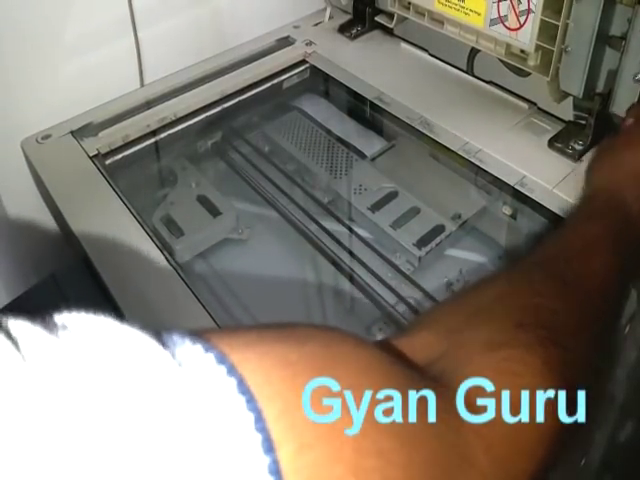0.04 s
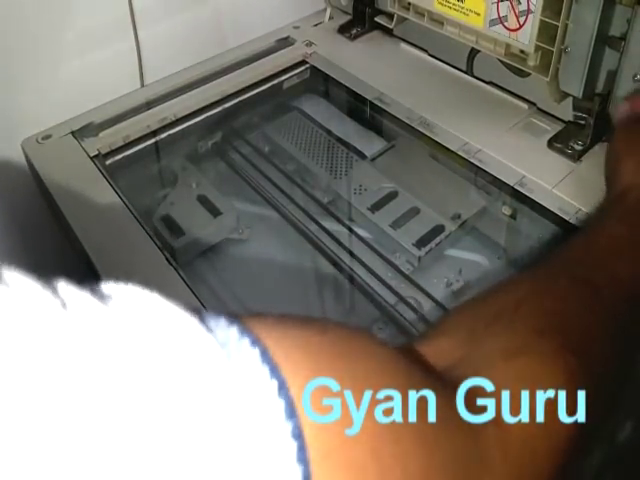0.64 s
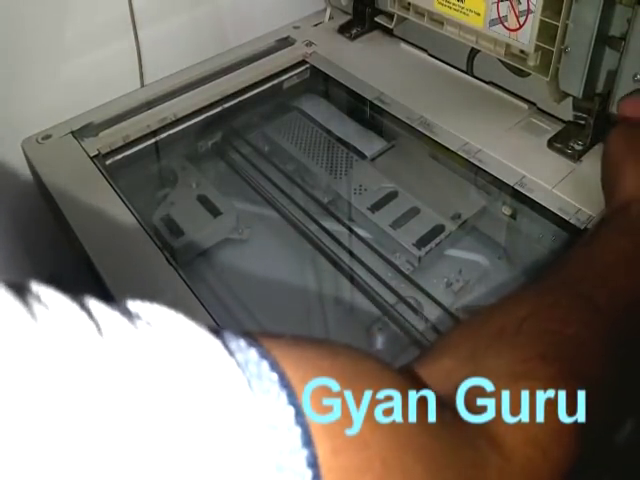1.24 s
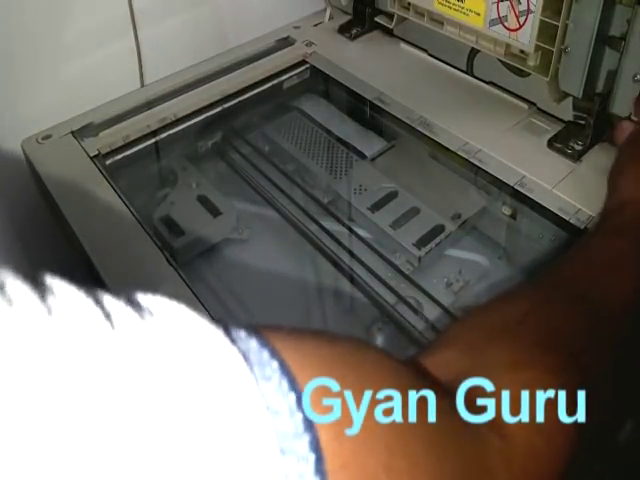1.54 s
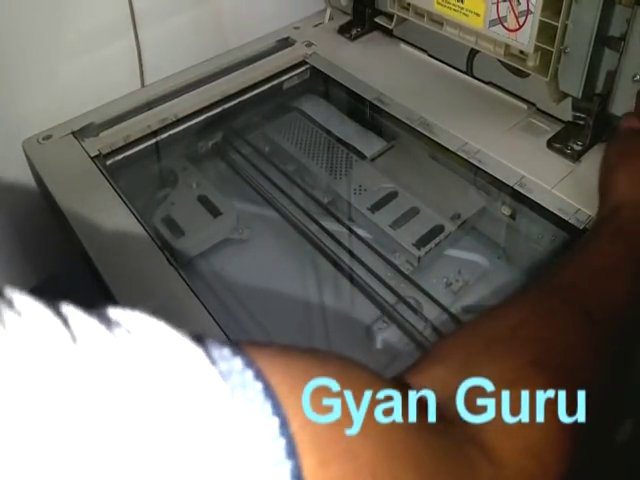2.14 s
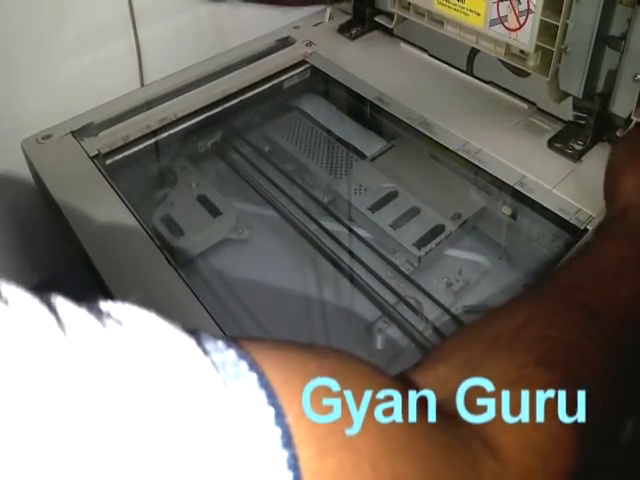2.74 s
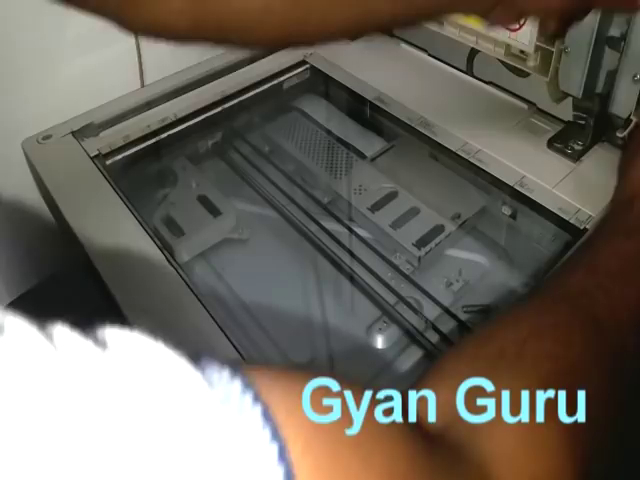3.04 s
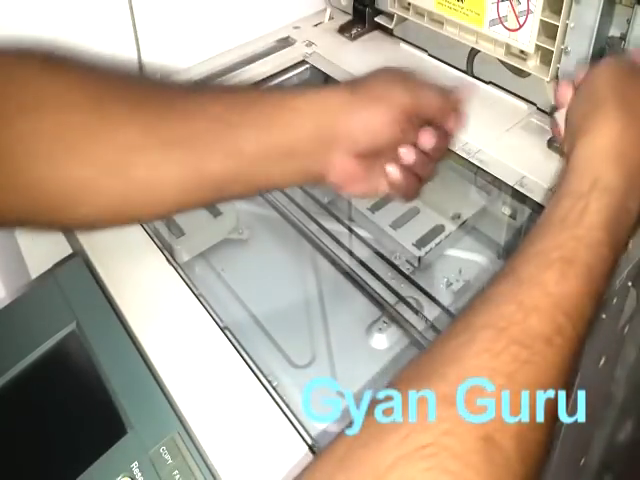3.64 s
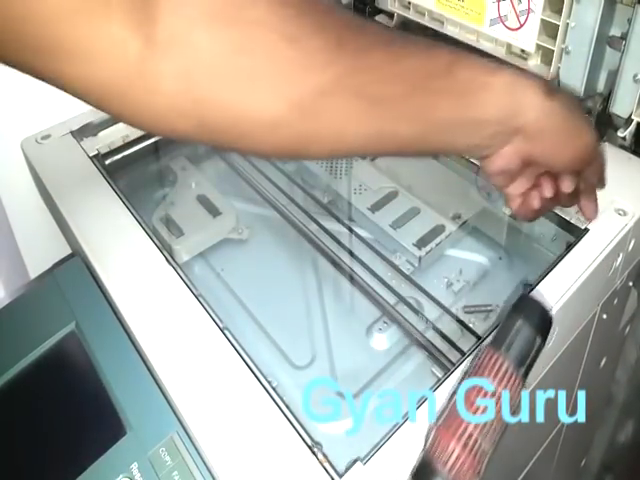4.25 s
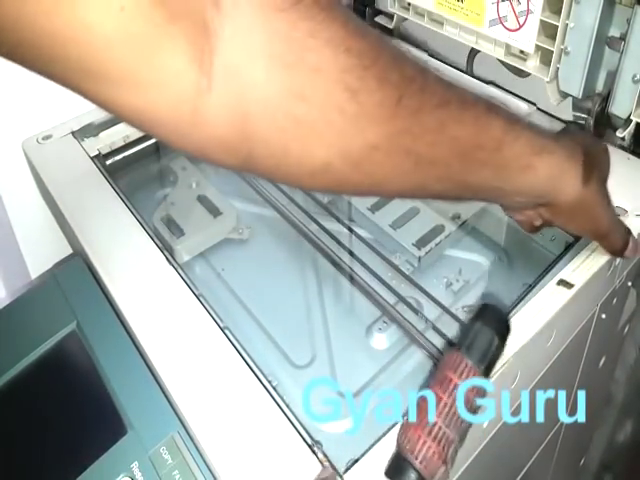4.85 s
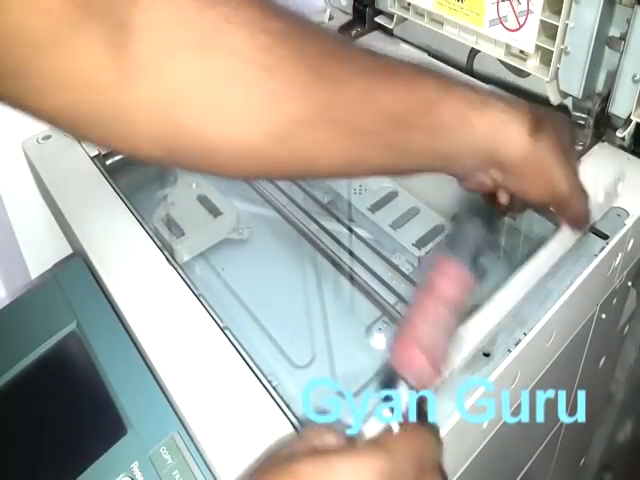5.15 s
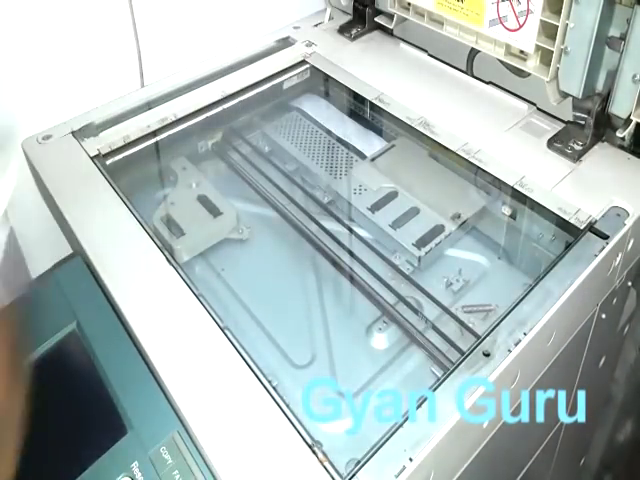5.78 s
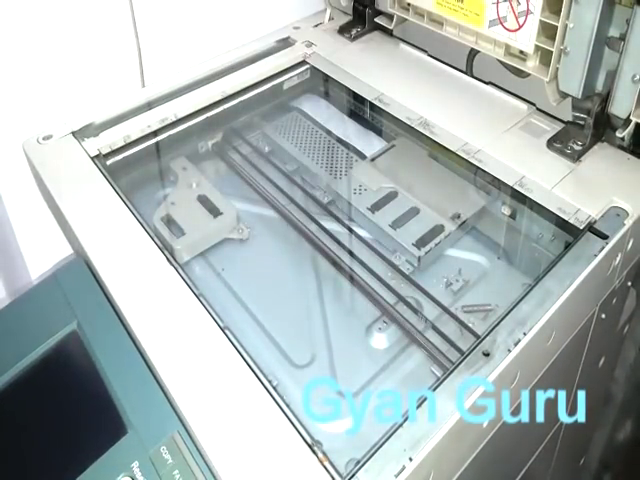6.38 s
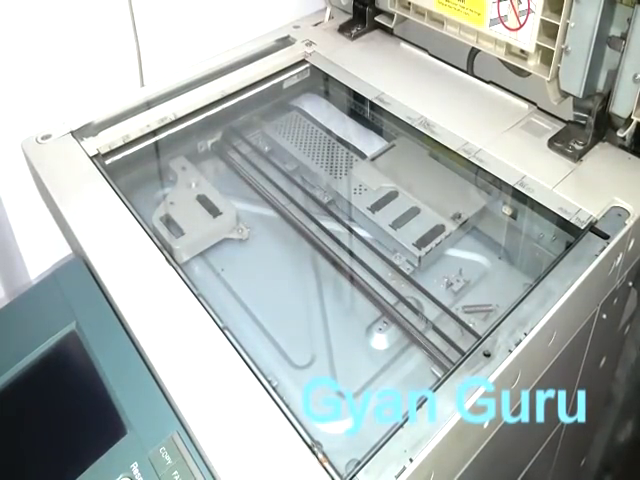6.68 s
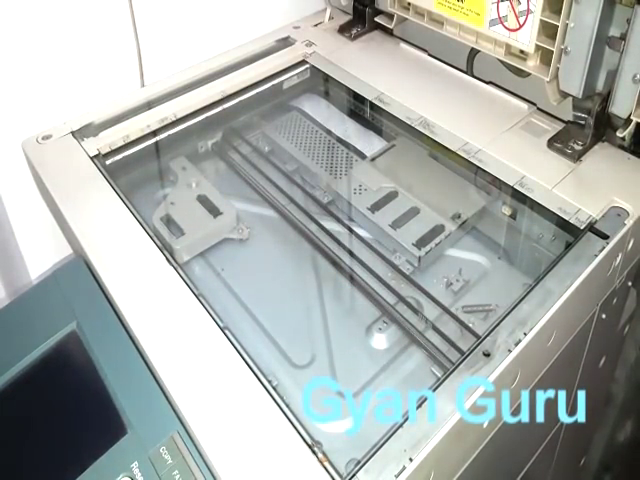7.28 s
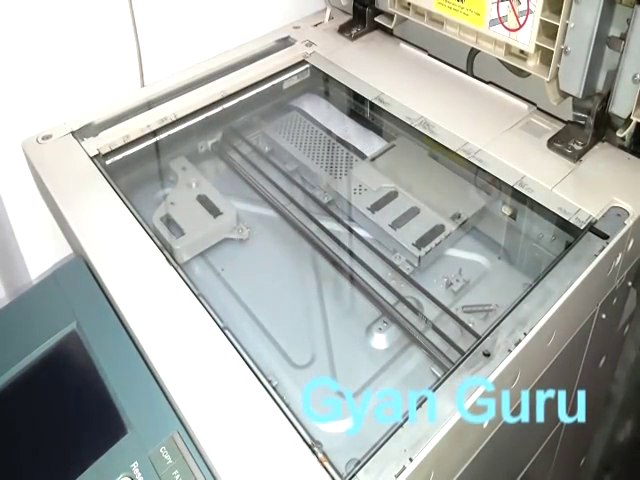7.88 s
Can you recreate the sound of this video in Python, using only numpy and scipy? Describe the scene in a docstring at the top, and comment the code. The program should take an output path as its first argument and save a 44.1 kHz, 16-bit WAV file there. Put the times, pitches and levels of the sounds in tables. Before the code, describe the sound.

A faint, high throbbing trill and a low fan hum fill a small room, picked up nearly in mono. A screw catches and grinds as it is turned, followed by a ringing screwdriver clack and hollow bumps on a copier. Plastic trim then strains and comes off with two cracks, the first the loudest sound, each with a quick flapping rattle. After light hand brushes, the strip lands with a dull thud and a tiny clink.

```python
"""A screw is backed out of a photocopier's frame, the screwdriver clacks against the machine, and a
plastic trim strip is prised off the glass and put down with a dull double thud. Each impact excites
the damped modes of the struck part; grinding and creaking are stick-slip friction. The room is small
and hard-walled; a fan hums and a high throbbing trill, like two crickets, goes on throughout."""
import sys
import numpy as np
from scipy import signal
from scipy.io import wavfile

SR = 44100
rng = np.random.default_rng(int(sys.argv[2]) if len(sys.argv) > 2 else 0)


def store_pcm(level_fs):
    """Save levels as 16-bit WAV."""
    pcm = np.round(np.clip(level_fs, -1, 1) * 32767).astype(np.int16)
    wavfile.write(sys.argv[1], SR, np.atleast_2d(pcm).T)


N = 349272
TIME = np.arange(N) / SR
BANDS_HZ = 31.25 * 2 ** (np.arange(28) / 3)

# An impact row gives time in seconds, level in dB, then its touch: bass, clack and sizzle in dB
# relative to the middle zone. A stroke row gives start and end in seconds, then level in dB.
# A spectrum row gives frequency in Hz and spectral density in dB.
# A mode row gives frequency in Hz, level in dB and T60 in seconds.

# Centres of the bass, middle, clack and sizzle zones in Hz.
ZONES_HZ = [350, 1200, 3800, 10500]
# Responses of the struck frame and screwdriver, as spectrum rows.
FRAME_SPECTRUM = [(60, -20.5), (130, -4.5), (280, 8.5), (500, 8), (800, -2), (1400, -7.5), (2500, -1.5),
                  (4000, -1.5), (6000, -1.5), (10000, -4.5), (15000, -14.5)]
TOOL_SPECTRUM = [(30, -28), (60, -14), (150, -2), (350, 5.5), (700, -1), (1400, -8), (2400, -10.5),
                 (3500, -11.5), (5000, -10), (7000, -7.5), (10000, -8), (15000, -14)]


def from_db(db):
    """Decibels express an amplitude ratio logarithmically."""
    return 10 ** (np.asarray(db) / 20)


def rms_one(x):
    """Normalisation to unit mean power."""
    return x / np.sqrt(np.mean(x ** 2) + 1e-20)


def at_bands(points):
    """Interpolation of (Hz, value) points in log frequency at the band centres."""
    hz, value = np.transpose(points)
    return np.interp(np.log(BANDS_HZ), np.log(hz), value)


def drift(rate):
    """Random modulation: a line through rate Gaussian values a second."""
    knots = rng.standard_normal(2000)
    return np.interp(TIME * rate, np.arange(len(knots)), knots)


def add(track, s, sound):
    """Superposition: a sound joins the track at s seconds."""
    start = int(s * SR)
    track[start:start + len(sound)] += sound[:N - start]


def noise_bank():
    """Band-pass filtering splits white noise into third octaves; neighbours are uncorrelated."""
    white, edge = rng.standard_normal((2, N)), 2 ** (1 / 6)
    filters = [signal.butter(2, [hz / edge, hz * edge], "band", fs=SR, output="sos") for hz in BANDS_HZ]
    return np.array([signal.sosfilt(sos, white[k % 2]) for k, sos in enumerate(filters)])


def band_decay(t60, length):
    """Exponential damping: each band builds up in about a cycle, then dies at its own rate."""
    t = TIME[:length]
    onset = (1 - np.exp(-2 * BANDS_HZ[:, None] * t)) ** 2
    return onset * np.exp(-np.log(1000) * t / t60[:, None])


def dense_modes(bank, envelope):
    """Modal overlap: crowded modes behave as bands of noise under an envelope."""
    length = envelope.shape[1]
    start = rng.integers(SR // 4, N - length)
    return bank[:, start:start + length] * envelope


def room_envelope(length):
    """Reverberation builds up as the first reflections arrive, then decays by absorption."""
    # Room decay. Each row: frequency in Hz, T60 in seconds.
    room_t60 = [(80, 0.83), (300, 0.46), (1000, 0.42), (3500, 0.32), (7000, 0.33), (14000, 0.13)]
    return band_decay(at_bands(room_t60), length) * (1 - np.exp(-TIME[:length] / 0.014))


def reverberation(bank, dry):
    """Convolution with a diffuse tail of unit energy gives the room's answer to a source."""
    tail = dense_modes(bank, room_envelope(SR * 3 // 4)).sum(axis=0)
    return signal.fftconvolve(dry, tail / np.linalg.norm(tail))[:N]


def soft_top(x, cutoff_hz=13200):
    """Low-pass filtering takes the highest treble from the quiet sounds."""
    return signal.sosfilt(signal.ellip(8, .5, 60, cutoff_hz, fs=SR, output="sos"), x)


def contact(hz, bass, clack, sizzle):
    """Contact hardness shapes the force spectrum, in dB relative to the middle zone."""
    return np.interp(np.log(hz), np.log(ZONES_HZ), [bass, 0, clack, sizzle])


def impacts(bank, rows, spectrum, gain_db, t60, bass_hold, room_db):
    """Impulse response: a crack, dense modes (low ones last longer) and the room add in power."""
    out, length = np.zeros(N), SR * 3 // 5
    crack = from_db(-2) * band_decay(np.full(len(BANDS_HZ), 0.022), length)
    ring = band_decay(t60 * (BANDS_HZ / ZONES_HZ[1]) ** -bass_hold, length)
    room = from_db(room_db) * room_envelope(length)
    envelope = np.sqrt(crack ** 2 + ring ** 2 + room ** 2)
    for s, level_db, *touch in rows:
        strength = from_db(level_db + gain_db + contact(BANDS_HZ, *touch) + at_bands(spectrum))
        add(out, s, strength @ dense_modes(bank, envelope))
    return out


def ringing(rows, modes, gain_db, spread_db):
    """Free vibration: each impact starts damped sines with random signs and a spread of levels."""
    out, t = np.zeros(N), TIME[:SR // 2]
    hz, mode_db, t60 = np.transpose(modes)
    cycles = hz[:, None] * t
    decay = np.exp(-np.log(1000) * t / t60[:, None])
    rings = np.sin(2 * np.pi * cycles) * (1 - np.exp(-2 * cycles)) * decay
    for s, level_db, *touch in rows:
        scatter_db = spread_db * rng.standard_normal(len(hz))
        strength = from_db(level_db + gain_db + contact(hz, *touch) + mode_db + scatter_db)
        add(out, s, (strength * rng.choice([-1, 1], len(hz))) @ rings)
    return out


def friction(bank, strokes, spectrum, gain_db, slips_per_s, uneven_db, t60):
    """Stick-slip friction: tiny uneven impulses shake a body during each stroke."""
    slips = (rng.random(N) < slips_per_s / SR) * from_db(uneven_db * rng.standard_normal(N))
    slips *= rng.choice([-1, 1], N)
    out, envelope = np.zeros(N), band_decay(np.full(len(BANDS_HZ), t60), SR // 10)
    for start, end, level_db in strokes:
        response = from_db(at_bands(spectrum)) @ dense_modes(bank, envelope)
        force = slips[int(start * SR) - len(response):int(max(end, start + .01) * SR)]
        shake = rms_one(signal.fftconvolve(force, response, "valid"))
        add(out, start, from_db(level_db + gain_db) * shake * signal.windows.tukey(len(shake), .5))
    return out


def room_air(bank):
    """Stationary broadband noise: the steady air of the room."""
    # The air, as spectrum rows.
    spectrum = [(25, -2), (55, -5.5), (85, -1), (112, 6), (140, -1.5), (200, 1.5), (300, 2.5), (420, -5),
                (1000, -10), (2600, -14), (5500, -22.5), (8000, -25), (12000, -26.5), (13500, -21),
                (15500, -58)]
    return from_db(-57) * rms_one(from_db(at_bands(spectrum)) @ bank)


def low_rush(bank):
    """Modulated noise: a low rush slowly fades, rising with the handling as the strip is prised off."""
    # The rushing noise, as spectrum rows.
    spectrum = [(40, -32), (100, -14.5), (350, 4.5), (1100, -1.5), (2500, -12), (5000, -28), (12000, -31.5)]
    rush = rms_one(from_db(at_bands(spectrum)) @ bank)[::-1]   # reversed: unrelated to the air
    handling_db = 13.5 * np.exp(-((TIME - 4.93) / 0.8) ** 2)
    return from_db(-55 - 3 * TIME + handling_db) * rush


def fan_hum():
    """Tonal noise: a fan's two low tones waver in frequency and amplitude."""
    # Each row: frequency in Hz, rms level in dB.
    tones = [(113, -66), (199.7, -61.5)]
    hum = np.zeros(N)
    for hz, level_db in tones:
        phase = 2 * np.pi * np.cumsum(hz + 1.69 * drift(8.8)) / SR
        hum += from_db(level_db) * rms_one(np.sin(phase) * (1 + 0.3015 * drift(3.5)))
    return hum


def cricket(chirp_rates, start_turn, hz, glide_hz, strokes_per_s, wander_hz, level_db):
    """Stridulation: wing strokes come in quick chirps, and the pitch sags through each stroke."""
    turn = start_turn + np.cumsum(np.interp(TIME, *np.transpose(chirp_rates))) / SR
    chirp = np.maximum(np.cos(2 * np.pi * turn) + 0.627, 0)
    stroke = np.cumsum(strokes_per_s * (1 + 0.028 * drift(9.4))) / SR % 1
    pitch = hz + glide_hz * (.5 - stroke) + wander_hz * drift(150)
    wings = np.sin(np.pi * stroke) * np.sin(2 * np.pi * np.cumsum(pitch) / SR)
    return from_db(level_db) * rms_one(chirp * wings)


def high_trill():
    """Amplitude modulation at two rates: a near and a far cricket-like voice throb out of step."""
    # Each row: time in seconds, chirps per second.
    near_rates = [(0, 10), (1.5, 9.96), (2, 10.08), (5, 10.08), (5.6, 10.3), (6.8, 10.3), (7.2, 10.02)]
    far_rates = [(0, 8.65), (7.9, 8.65)]
    near = cricket(near_rates, start_turn=0.7, hz=7290, glide_hz=707, strokes_per_s=109,
                   wander_hz=69.7, level_db=-59.5)
    far = cricket(far_rates, start_turn=0.36, hz=6710, glide_hz=894, strokes_per_s=99,
                  wander_hz=110.5, level_db=-71)
    return near + far


def screw_turns():
    """Stick-slip in a thread: the blade bites, the screw grinds, catches and runs on."""
    # Each row: time of the catch in seconds, its level in dB, its hardness in dB,
    # lead of the bite in seconds, grinding level in dB.
    turns = [(0.339, -38, 0, 0.075, -62), (1.654, -24.5, 6.5, 0.14, -39), (2.099, -33.5, 0.5, 0.091, -43.5),
             (2.614, -33.5, -1.5, 0.204, -44)]
    bass, clack, sizzle = -1.9, -17, -36.5
    bite_s, rest_s, grind_s, run_on_s = 0.037, 0.0071, 0.102, 0.129
    knocks, strokes = [], []
    for s, knock_db, hard_db, lead, grind_db in turns:
        bite = s - lead
        grind = bite + bite_s + rest_s
        knocks += [(bite, -46, bass, clack, sizzle),
                   (s, knock_db, bass - hard_db, clack + hard_db, sizzle),
                   (s + 0.011, knock_db - 9, 0.92, -27, -20)]   # the blade drops back into the slot
        strokes += [(bite, bite + bite_s, grind_db - 0.5),
                    (grind, grind + grind_s, grind_db),
                    (s, s + run_on_s, grind_db - 5)]
    return knocks, strokes


def frame_knocks(bank, catches):
    """Impact excitation: the screw's catches and light stray knocks ring the frame."""
    # Stray knocks as impact rows; the frame's resonances as mode rows.
    strays = [(0.879, -49.5, -2, -11, -20), (4.137, -44, -10, -6, -41), (5.644, -45, -31, -3.5, -24),
              (5.796, -41, -13, -16.5, -22)]
    modes = [(297, 1.5, 0.71), (452, 3, 0.13), (688, -6, 0.33), (1686, -9, 0.27), (1895, -7, 0.28),
             (2697, -33, .3), (4172, -18, .22)]
    hits = catches + strays
    knocks = impacts(bank, hits, FRAME_SPECTRUM, gain_db=7.5, t60=0.14, bass_hold=0.18, room_db=-6)
    return knocks + ringing(hits, modes, gain_db=-11.5, spread_db=0)


def screw_grinding(bank, grinds):
    """Structure-borne sound: friction in the thread and on the frame radiates as a low grinding."""
    # Rubs on the frame as stroke rows; the body they shake as spectrum rows.
    rubs = [(1.367, 1.428, -51.5), (2.955, 3.068, -44.5), (5.298, 5.467, -48)]
    body = [(100, -42), (220, 4), (320, 4), (520, 2), (750, -17.5), (1500, -23.5), (4000, -32.5),
            (12000, -41.5)]
    return friction(bank, grinds + rubs, body, gain_db=-3, slips_per_s=260, uneven_db=7, t60=0.051)


def screwdriver(bank):
    """Hard contact excites high modes: the blade pings off the screw and the tool hits the machine."""
    # Clacks of the tool and skids of its tip, as impact rows.
    clacks = [(3.004, -27, -11.5, 1.6, -32), (3.058, -17.5, -14, 12.3, -8.5), (3.071, -22, -2.5, 2, -26),
              (3.574, -57.5, -11, 13.6, 1), (3.807, -64, -3, 10, 6)]
    skids = [(2.988, -31.5, -17, 2, -29), (3.044, -18, -11.5, 6.5, -29)]
    # Resonances of the tool and its tip, as mode rows.
    tool_modes = [(652, 5, 0.35), (940, 0.5, 0.41), (2660, -10, 0.37), (3365, -1, 0.19), (3418, 0, 0.29),
                  (3475, -3.5, .33), (3900, -17, .18), (7270, 9.5, 0.2)]
    tip_modes = [(4250, -9, 0.068), (4260, -0.5, 0.097), (4480, -18, .04), (5200, -12, .04)]
    tool = impacts(bank, clacks, TOOL_SPECTRUM, gain_db=8.5, t60=0.17, bass_hold=0.17, room_db=-6.5)
    tool += ringing(clacks, tool_modes, gain_db=-17, spread_db=0)
    tip = impacts(bank, skids, TOOL_SPECTRUM, gain_db=6, t60=0.13, bass_hold=0.24, room_db=-1)
    tip += ringing(skids, tip_modes, gain_db=-9.5, spread_db=10)
    return tool + tip


def hand_brushes(bank):
    """Sliding friction: the dense slips of a hand on the casing merge into a hiss."""
    # The brushes as stroke rows; rubbing skin as spectrum rows.
    brushes = [(3.7, 3.82, -67), (5.305, 5.368, -54.5), (5.633, 5.718, -64.5), (6.197, 6.316, -61),
               (6.523, 6.6, -62), (6.62, 6.672, -55.5)]
    skin = [(200, -23), (1500, 1), (5000, -5), (7500, 0), (9000, -6), (13000, -2), (15000, -22)]
    return friction(bank, brushes, skin, gain_db=0.5, slips_per_s=3500, uneven_db=4, t60=0.0067)


def trim_scraping(bank, creaks):
    """Friction on a heavily damped body: the plastic strip scrapes, creaks and rattles."""
    # Rubs along the strip as stroke rows; its response as spectrum rows.
    rubs = [(3.921, 4.287, -57), (4.865, 5.177, -43.5)]
    body = [(40, -35), (100, -20), (300, 11), (1000, -2), (1500, -3), (3300, -6), (5500, -29.5),
            (8000, -19.5), (14000, -30)]
    return friction(bank, creaks + rubs, body, gain_db=-5.5, slips_per_s=600, uneven_db=2, t60=0.012)


def casing_bumps(bank):
    """Panel resonance: the screwdriver's handle bumps the hollow casing."""
    # The bumps as impact rows; the casing's resonances as mode rows.
    bumps = [(4.275, -31, -4, -1.5, -38), (4.347, -29, -6, -15.5, -31.5), (4.351, -20.5, -18, -12.5, -41.5),
             (4.39, -39, -3.5, -15.5, -30)]
    modes = [(124.4, 7, .35), (244, 10.5, .25), (293, 6.5, 0.47), (576, 1, 0.33), (964, -5, 0.27),
             (1421, -4, 0.235), (1850, -7.5, 0.12), (2360, -6, 0.177), (2810, -2, 0.17), (3360, -8.5, 0.16)]
    knocks = impacts(bank, bumps, FRAME_SPECTRUM, gain_db=6, t60=0.062, bass_hold=0.26, room_db=-8)
    return knocks + ringing(bumps, modes, gain_db=-13, spread_db=4)


def straining(snap_s, lead, creak_db, rise_db_per_s=189.5):
    """Stick-slip under rising load: the bent strip slips ever sooner and creaks ever louder."""
    slips = snap_s - lead * 0.51 ** np.arange(4)
    ticks = [(t, -30.5, -2, -1, -14) for t in slips]
    creaks = [(start, end, creak_db - rise_db_per_s * (snap_s - (start + end) / 2))
              for start, end in zip(slips, [*slips[1:], snap_s])]
    return ticks, creaks


def flapping(snap_s, snap_db, touch, lasts, loss_db):
    """Inelastic rebounds: the freed end slaps the frame sooner, weaker and duller, rattling between."""
    dulling_db = np.array([0, -1.78, -5.5])   # change of touch per flap
    slaps, rattles, t, k = [], [], snap_s, 0
    while t < snap_s + lasts and k < 10:
        gap = 0.0445 * 0.96 ** k
        level_db = snap_db - 0.5 - k * loss_db
        if k:
            slaps.append((t, level_db, *(np.array(touch) + k * dulling_db)))
        slaps.append((t + 0.47 * gap, level_db - 7.5, -13, -13.5, -33.5))   # softer backswing
        rattles.append((t, t + gap, level_db - 17.5))
        t, k = t + gap, k + 1
    return slaps, rattles


def prising():
    """Release of elastic energy: each end of the strip strains, snaps free and flaps."""
    # Each row: time in seconds, level, bass, clack and sizzle in dB, straining time in seconds,
    # creak level in dB, flapping time in seconds, loss per flap in dB.
    snaps = [(4.6625, -7, -19.5, -2.5, -16, 0.146, -17.5, 0.19, 4),
             (5.0, -17.5, -11, -2, -9, 0.065, -36, 0.11, 1.86)]
    hits_by_end, strokes = [], []
    for s, level_db, *touch, lead, creak_db, lasts, loss_db in snaps:
        ticks, creaks = straining(s, lead, creak_db)
        double_crack = [(s, level_db, *touch), (s + 0.003, level_db - 1, *touch)]
        slaps, rattles = flapping(s, level_db, touch, lasts, loss_db)
        hits_by_end.append(ticks + double_crack + slaps)
        strokes += creaks + rattles
    return hits_by_end, strokes


def trim_snaps(bank, first_hits, last_hits):
    """Transient response: the strip cracks as each end comes free, then ticks against the frame."""
    # Responses of the strip's two ends, as spectrum rows.
    first_end = [(30, -38), (60, -17), (150, -10), (350, 8), (650, 1.5), (1050, 1), (1500, -7.5),
                 (2200, -2.5), (3400, -0.5), (5000, -5), (7200, 0.5), (9000, -11), (14000, -1)]
    last_end = [(30, -28), (60, -16), (150, -4), (350, 7.5), (700, -1.5), (1200, -6.5), (1900, -3),
                (3500, -4), (5500, -11), (7500, -9.5), (10000, -18.5), (15000, -18)]
    # The strip's resonances as mode rows; its loose tick as an impact row.
    modes = [(1018, 3, 0.3), (1131.5, 0.5, 0.17), (1150, -10.5, 0.19), (1341, 0.5, 0.2), (1930, -2.5, 0.22),
             (2168, -7.5, 0.47), (2230, -6, 0.36), (2900, -20, .2), (3140, -6, .2), (3350, -3, 0.22),
             (3661, -5, 0.15), (3990, -6, 0.2), (6245, -20, .22), (7125, 20, 0.058)]
    taps = [(5.378, -32.5, -25, 0, -7)]
    first = impacts(bank, first_hits, first_end, gain_db=8.5, t60=0.072, bass_hold=0.074, room_db=-8.5)
    first += ringing(first_hits, modes, gain_db=-17, spread_db=3)
    last = impacts(bank, last_hits + taps, last_end, gain_db=7.5, t60=0.11, bass_hold=0.46, room_db=-6.5)
    return first + last


def table_thud(bank):
    """Soft contact excites mainly low modes: the strip is put down on a table."""
    # The landings as impact rows; the table's response as spectrum rows and as mode rows.
    landings = [(7.167, -18.5, -9, -35, -41), (7.204, -30, 4.5, -16, -46), (7.217, -19, -9, -29, -43),
                (7.225, -23, -7, -19, -27), (7.388, -41, -3, -29, -29)]
    tabletop = [(30, -24), (42, -10), (65, -3), (150, 6.5), (250, 5), (450, 8), (800, -1.5), (1300, -8),
                (2000, -17), (3500, -8), (6000, -10), (14000, -14)]
    modes = [(63, -1, 1), (87.2, 1.5, 0.58), (150, 2.5, 0.28), (201, 10.5, 0.31), (289, -1, 0.2)]
    thuds = impacts(bank, landings, tabletop, gain_db=12.5, t60=0.086, bass_hold=0.43, room_db=-8)
    return thuds + ringing(landings, modes, gain_db=-15, spread_db=2.5)


def loose_piece(bank):
    """Small bodies have high natural frequencies: a loose piece clinks after the thud."""
    # The clinks as impact rows; the piece's resonances as mode rows.
    clinks = [(7.228, -45, -10, 4, -5), (7.293, -43, -10, 10.7, -5.5)]
    modes = [(2590, -21, 0.31), (3280, -24, 0.22), (4180, -18, 0.09), (4330, -15.5, 0.14), (5800, -2, .035),
             (6000, -2, 0.054), (6400, 1, .035)]
    ticks = impacts(bank, clinks, TOOL_SPECTRUM, gain_db=11.5, t60=0.037, bass_hold=0.2, room_db=-5.5)
    return ticks + ringing(clinks, modes, gain_db=2, spread_db=2.5)


def scene():
    """Superposition of the handling and the steady sounds in one room, heard almost in mono."""
    bank = noise_bank()
    catches, grinds = screw_turns()
    hits_by_end, creaks = prising()
    knocks = frame_knocks(bank, catches) + casing_bumps(bank) + screwdriver(bank)
    strip = trim_snaps(bank, *hits_by_end) + table_thud(bank)
    rubs = screw_grinding(bank, grinds) + trim_scraping(bank, creaks) + hand_brushes(bank)
    trill = high_trill()
    room = from_db(-5) * reverberation(bank, rubs) + from_db(5) * reverberation(bank, trill)
    mid = knocks + strip + loose_piece(bank) + trill
    mid += soft_top(rubs + room + room_air(bank) + low_rush(bank) + fan_hum())
    hiss = from_db(-69.5) * rms_one(soft_top(rng.standard_normal(N)))
    side = from_db(-68.5) * reverberation(bank, mid) + hiss
    return np.array([mid + side, mid - side])


def record(dry):
    """Clipping and band limiting: peaks stop at full scale; the deep bass and the top are cut."""
    bass_cut = signal.butter(3, 46, "high", fs=SR, output="sos")
    top_cut = signal.cheby2(12, 72, 16000, fs=SR, output="sos")
    return signal.sosfilt(top_cut, signal.sosfilt(bass_cut, np.clip(dry, -1, 1)))


dry = scene()
out = record(dry)
store_pcm(out)
```